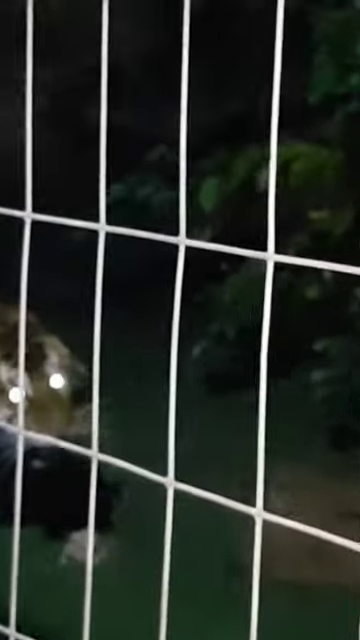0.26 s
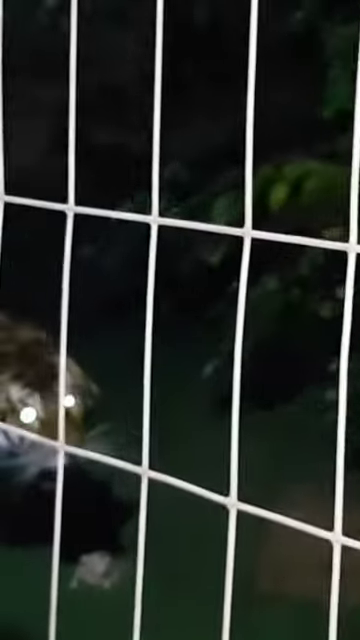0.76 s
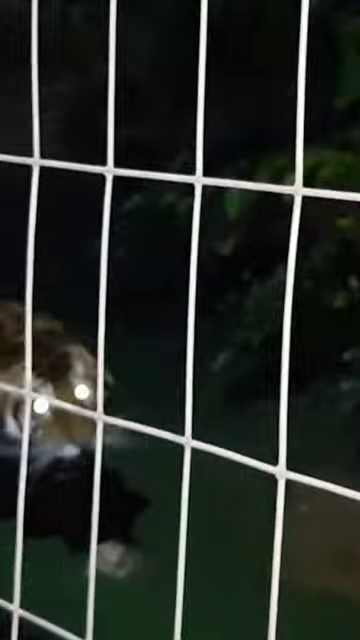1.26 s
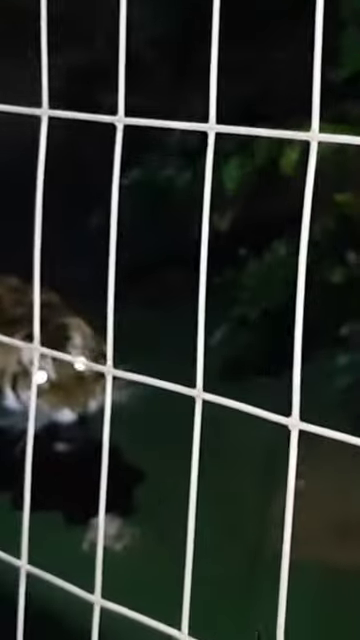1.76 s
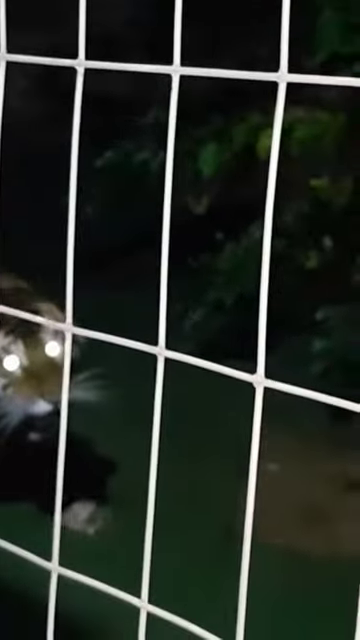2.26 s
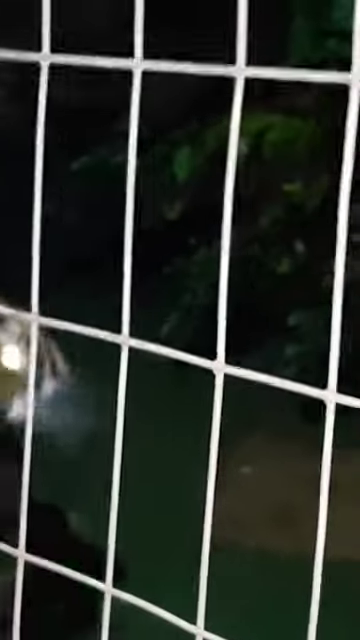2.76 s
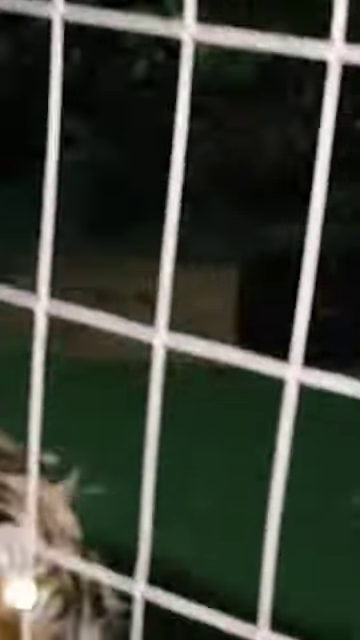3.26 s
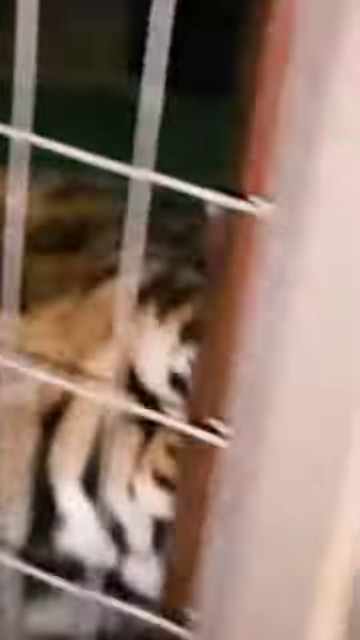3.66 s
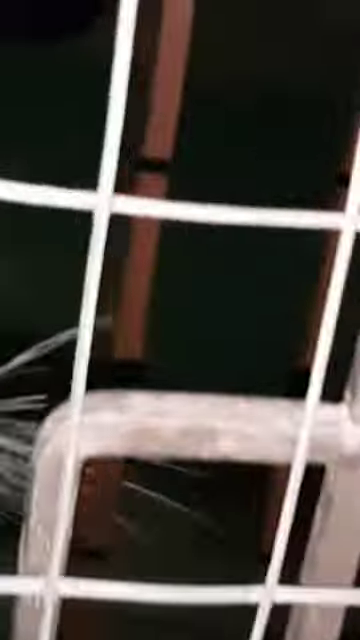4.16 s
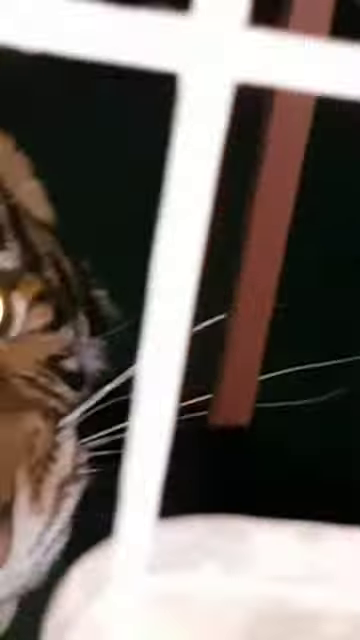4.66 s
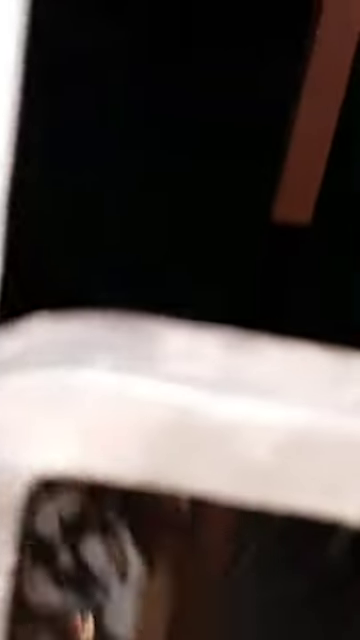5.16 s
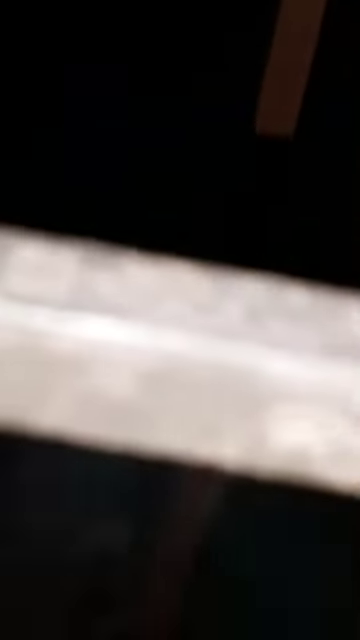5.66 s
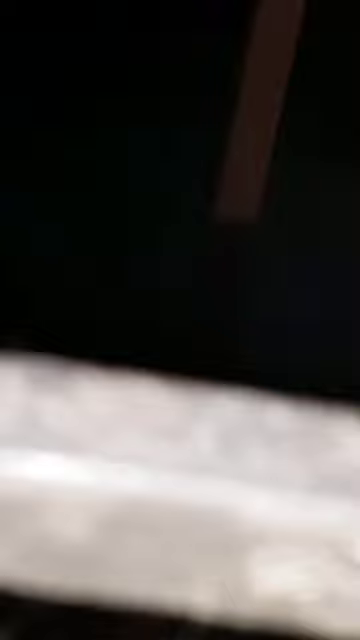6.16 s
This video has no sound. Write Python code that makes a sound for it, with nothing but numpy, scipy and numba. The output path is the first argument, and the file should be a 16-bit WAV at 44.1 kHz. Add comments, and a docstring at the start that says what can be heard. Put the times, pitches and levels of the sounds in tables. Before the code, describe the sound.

A tiger in a hard-walled pen at night, heard close by a phone. From 0 to 0.8 s a faint deep purr beats slowly, under it weak outdoor noise and a low hum that sinks between 0.9 and 1.6 s. From 0.8 s a faster, rough inward growl swells, with a hard slap near 1.36 s; from 1.73 s a slower ticking outward growl grows until 2.4 s. Ragged growling with a cluster of hard wet knocks comes at 2.5-2.8 s, then one explosive, wide-mouthed, hissing roar peaks around 3.0-3.1 s. It collapses raggedly to near silence by 3.6 s, with barely audible nose whistles. At 3.8 s a long fluttering chest growl starts abruptly and rolls in waves until 6.0 s; a thin nose whistle appears near 5.9 s. From 6.05 s a loud raspy inward breath swells with faint rising whistling, cut off around 6.4 s.

```python
"""At night a tiger purrs quietly, growls breath after breath, and near 2.8 s bursts into one roar. The roar
dies down, a long growl breathed out follows, and from 6.05 s an inward breath swells. Slack vocal folds slap
about 23-65 times a second; each slap pushes the chest, rings throat, mouth and nose, and the air comes in puffs
of hiss. Hard single slaps join from 1.36 s and faint nose whistles from 3.55 s. A hard-walled pen answers the
animal throughout, over faint outdoor noise; a low hum sounds under the purr and sinks early on."""
import sys
import numpy as np
from scipy import signal
from scipy.fft import rfft, irfft, next_fast_len
from scipy.io import wavfile
from scipy.ndimage import uniform_filter1d, map_coordinates
from numba import njit

SR = 44100
rng = np.random.default_rng(int(sys.argv[2]) if len(sys.argv) > 2 else 0)


def inscribe(sig):
    """Save sig as 16-bit PCM at rate SR to the path in sys.argv[1].

    A 1-D sig is mono; a 2-D sig holds one channel per row.
    Samples are clipped to [-1, 1] before scaling.
    """
    pcm = np.round(np.clip(np.atleast_2d(sig).T, -1, 1) * 32767)
    wavfile.write(sys.argv[1], SR, pcm.astype(np.int16))


N = 283563
TIME = np.arange(N) / SR


def amp(db):
    """Decibel law: 20 dB is a factor of ten in amplitude."""
    return 10 ** (np.asarray(db) / 20)


def unit(x):
    """Normalisation to an rms of 1."""
    return x / np.sqrt(np.mean(x ** 2) + 1e-20)


def curves(rows):
    """Linear interpolation: one value per sample for each column after the time."""
    s, *cols = np.transpose(rows)
    return [np.interp(TIME, s, c) for c in cols]


def wobble(rate):
    """Band-limited fluctuation: a smooth random curve with `rate` knots a second."""
    knots = rng.standard_normal(int(N * rate / SR) + 4)
    return map_coordinates(knots, [TIME * rate])


def blend(part, a, b):
    """Equal-power mixing from a (part 0) to b (part 1)."""
    part = np.clip(part, 0, 1)
    return np.sqrt(1 - part) * a + np.sqrt(part) * b


def shared(total_db, *over_db):
    """Power addition: divides a level among layers that stand over_db above the first."""
    first = total_db - 10 * np.log10(1 + sum(amp(db) ** 2 for db in over_db))
    return [first] + [first + db for db in over_db]


def colour(x, points):
    """Minimum-phase filtering: a causal filter with the gain of (Hz, dB) points, brought to rms 1."""
    m = 2 * next_fast_len(N // 2 + 4096)
    f, db = np.transpose(points)
    hz = np.fft.rfftfreq(m, 1 / SR)
    gain = amp(np.interp(np.log(hz + 1), np.log(f + 1), db))
    cepstrum = irfft(np.log(gain + 1e-6), m)
    # folding the cepstrum onto positive time makes the filter causal
    cepstrum[1:m // 2] *= 2
    cepstrum[m // 2 + 1:] = 0
    return unit(irfft(rfft(x, m) * np.exp(rfft(cepstrum)), m)[:N])


def split(x, edge_hz):
    """Band separation: the parts below and above a frequency, each of rms 1."""
    filters = [signal.butter(3, edge_hz, kind, fs=SR, output="sos") for kind in ("low", "high")]
    return [unit(signal.sosfiltfilt(sos, x)) for sos in filters]


@njit
def two_pole(x, a, b):
    """Resonance by feedback: two moving poles, with zeros at 0 Hz and the top of the band."""
    y = np.zeros(len(x))
    for i in range(2, len(x)):
        y[i] = x[i] - x[i - 2] + a[i] * y[i - 1] - b[i] * y[i - 2]
    return y


def ring(x, centre_hz, width_hz):
    """Damped resonance: its centre and width may move, and a wider one dies sooner."""
    r = np.exp(-np.pi * width_hz / SR) * np.ones(N)
    return unit(two_pole(x, 2 * r * np.cos(2 * np.pi * centre_hz / SR), r * r))


def cavities(x, table, drift=0.026, flicker_db=2.8):
    """Parallel resonance: narrow cavities wander with the tongue and ring unevenly from slap to slap."""
    total = 0
    for hz, width, db in table:
        narrow = ring(x, hz * (1 + drift * wobble(6)), width)
        total = total + amp(db + flicker_db * wobble(45)) * ring(narrow, hz * np.ones(N), 5 * width)
    return unit(total)


# Ways the folds move. Each row: timing scatter as a share of a cycle, basic noise share 0-1,
# puff length as a share of a cycle, weakening of every second slap 0-1.
TICKING = (.012, .22, .21, 0)
FIRM = (.01, .21, .29, 0)
LOOSE = (.04, .32, .3, 0)
PURRING = (.02, .33, .25, 0)
DOUBLED = (.035, .44, .35, .25)
RAGGED = (.1, .5, .3, 0)
ROARING = (.12, .75, .6, 0)

# Postures of folds and tract. Each row: start in seconds, way the folds move, inward share 0-1,
# jaws-wide share 0-1, throat in Hz, its glide in Hz per second, mouth in Hz, nose in Hz,
# throat over effort in dB, nose over mouth in dB, rasp over mouth in dB, grit over hiss in dB, fizz over hiss in dB.
POSTURES = [(0, PURRING, 0.53, 0, 248, 0, 645, 812, -15, -4, -3.5, -0.5, -18),
            (.78, DOUBLED, .99, 0.13, 248, 20, 610, 775, -19, -6, -6.5, 12, -5),
            (1.33, DOUBLED, 0.97, 0.034, 333, 30, 600, 770, -12.5, -9.5, -8.5, 6.5, -6.5),
            (1.73, TICKING, 0.31, 0, 261, 5, 638, 807, -12.5, -3, -5.5, 5.5, -22),
            (2.03, FIRM, 0.28, 0, 254, 3, 622, 873, -10.5, -5, -1.5, 3.5, -16),
            (2.43, RAGGED, 0.91, 0.11, 285, 100, 624, 836, -9, -6.5, -7, 7, -6.5),
            (2.74, LOOSE, 0.7, 0.61, 338, 100, 647, 820, -17.5, -9, -7, 2.5, -18),
            (2.83, ROARING, 0.68, 0.78, 371, -330, 570, 927, -5, -6, -6, 3.5, -2),
            (3.19, RAGGED, 0.45, 0.61, 277.6, 22, 596, 783, -4.5, -3, -1.5, -1.5, 1),
            (3.48, RAGGED, 0.52, 0.55, 272, 20, 600, 790, -7.5, -2, -1, 8, -12),
            (3.76, LOOSE, 0.028, 0.058, 293.5, -100, 622, 810, -6.5, -16, -11, 5.5, -7.5),
            (4.0, LOOSE, 0.071, 0.095, 273, -64, 655, 797, -7.5, 2.5, -3, 9.5, -6),
            (4.301, TICKING, 0.027, .03, 247, 63, 670, 733, -7.5, 0.5, -2, 3.5, -9.5),
            (4.6, TICKING, 0.012, 0.044, 282.2, -5, 651.2, 780, -9, -8, 1, 0.5, -10.5),
            (5.28, FIRM, 0.017, 0.11, 288, 5, 640, 825, -9, -14, -4, 7, -3),
            (5.521, FIRM, 0.0089, 0.0073, 291, -20, 679, 826, -10.5, 3.5, 0.5, 7.5, -5),
            (5.74, FIRM, 0.0071, 0.036, 271, -52, 663, 867, -11, 7, -1.5, 7.5, -5),
            (6.06, LOOSE, 0.78, 0.25, 296, 95, 672, 827, -10.5, -1.5, -6.5, 14, 2.5),
            (6.231, FIRM, 0.66, 0.15, 346, -200, 676, 774, -5, -1.5, -9, 6.5, 3)]
BLEND_S = .05  # one posture melts into the next


def postures():
    """Quasi-steady articulation: held values melt together, and throat glides start anew with each row."""
    rows = np.array([(s, *manner, *rest) for s, manner, *rest in POSTURES])
    current = np.searchsorted(rows[:, 0], TIME, "right").clip(1) - 1
    start, *cols = rows[current].T
    glide = cols.pop(7)
    cols[6] = cols[6] + glide * np.minimum(TIME - start, .6)
    return uniform_filter1d(np.array(cols), size=round(BLEND_S * SR), axis=1)


# Slap rate before it bends to the marked slaps. Each row: time in seconds, rate in Hz.
SLAP_RATE = [(0, 27.23), (.25, 26.05), (.59, 22.8), (.77, 22.73), (.79, 64.14), (.96, 64.66), (1.21, 62.43),
             (1.4, 55.26), (1.69, 58.07), (1.75, 32.59), (1.85, 34.86), (2.1, 44.06), (2.22, 44.01),
             (2.4, 38.83), (2.46, 32.35), (2.7, 32.58), (2.76, 52.44), (3.08, 46.86), (3.46, 42.9),
             (3.74, 45.5), (3.8, 47.07), (3.96, 44.02), (4.04, 41.32), (4.16, 39.54), (4.26, 35.25),
             (4.34, 31.93), (4.5, 34.31), (4.68, 32.77), (4.91, 36.97), (5.12, 32.2), (5.26, 36.37),
             (5.35, 40.1), (5.46, 41.63), (5.55, 43.07), (5.68, 40.86), (5.8, 39.25), (5.88, 37),
             (6.0, 32.94), (6.09, 41.8), (6.43, 35.48)]
# Marked slaps; the rate bends a little to land on them, before timing scatter. Each entry: time in seconds.
MARKED_SLAPS = [2.045, 3.825, 4.473, 5.418, 5.732, 6.321]


def folds(jitter, length, second, scatter_db=2.0):
    """Relaxation oscillation: slaps at equal power for any rate, and a maker of the puffs around them."""
    rate_hz, = curves(SLAP_RATE)
    cycle = np.cumsum(rate_hz) / SR
    for last, s in zip([0] + MARKED_SLAPS, MARKED_SLAPS):
        due = cycle[round(s * SR)]
        cycle = cycle + np.interp(TIME, [last, s], [0, round(due) - due])
    cycle = cycle + jitter * wobble(45)
    count = np.floor(np.maximum.accumulate(cycle)).astype(int)
    size = amp(scatter_db * rng.standard_normal(600))[count - count[0]]
    size = size * (1 - second * (count % 2))
    slaps = np.diff(count, prepend=count[0]) * size * np.sqrt(SR / rate_hz)

    def puff(leak, uneven_db=1.5, slip=0.08):
        """Modulated turbulence: fresh noise in puffs of uneven strength, a little early or late."""
        turn = 2 * np.pi * (cycle - .06 + slip * wobble(40))
        # quick rise, slower fall
        swell = np.exp(0.098 * (np.cos(turn) - 0.35 * np.sin(2 * turn) - 1) / length ** 2)
        flow = (swell + leak) / np.sqrt(length)
        return unit(amp(uneven_db * wobble(40)) * flow * rng.standard_normal(N))
    return unit(slaps), puff


# Chest and windpipe breathing out, breathing in, and with jaws wide.
# Each row: frequency in Hz, relative gain in dB.
CHEST_OUT = [(25, -23), (40, 3), (72, 4.5), (100, -2.5), (122, 3), (145, 3), (200, -9), (260, -13),
             (400, -92), (900, -120)]
CHEST_IN = [(25, -38.5), (60, 8), (125, -6), (155, -1.5), (190, 10), (230, -11), (300, -11), (400, -89),
            (900, -120)]
CHEST_WIDE = [(25, -30), (60, 4), (108, 0), (135, 1.5), (165, 7.5), (220, -10), (300, 4), (400, -93),
              (900, -120)]


def chest(flaps, puff, share, inward, wide):
    """Forced vibration: the chest follows the slaps almost cleanly."""
    low = blend(share ** 2, flaps, puff(0.59))
    # the first, quiet purr sits as deep as an inward breath
    deep = np.maximum(inward, TIME < POSTURES[1][0])
    breath = blend(deep, colour(low, CHEST_OUT), colour(low, CHEST_IN))
    return blend(wide, breath, colour(low, CHEST_WIDE))


def throat(flaps, puff, share, wide, hz):
    """Cascaded resonance: a sharp ring and a broad one, both narrower with jaws wide."""
    sharp = ring(blend(share + 0.16, flaps, puff(1.0)), hz, 100 - 45 * wide)
    return ring(sharp, 0.97 * hz, 380 - 170 * wide)


def mouth(slaps, puff, share, inward, hz):
    """Cascaded resonance: the mouth rings at each slap, more damped on inward breaths."""
    source = blend(share + .3, slaps, puff(.25))
    sharp = ring(source, hz, 60 + 60 * inward)
    return amp(1.5 * wobble(45)) * ring(sharp, hz, 260 + 150 * inward)


def nose(slaps, puff, share, hz):
    """Cascaded resonance: the nose rings at the slaps and at noisy puffs."""
    source = blend(share + 0.6, slaps, puff(0.073))
    return amp(1.16 * wobble(45)) * ring(ring(source, hz, 140.0), hz, 155)


# Narrow cavities breathing out, breathing in, and with jaws wide.
# Each row: frequency in Hz, width of the sharp ring in Hz, relative level in dB.
RINGS_OUT = [(1054, 29, 1), (1555, 44, 0), (1910, 128, 6.5), (2159, 57, 1.5), (2814, 93, -6.5),
             (3157, 79, -6.5), (3544, 10, -14), (3956, 84, -9.5)]
RINGS_IN = [(1040, 42, -2.5), (1472, 55, 3), (1756, 84, -1.5), (2074, 47, -5.5), (2536, 65, -6.5)]
RINGS_WIDE = [(1100, 160, 0), (1424, 76, 2.5), (1856, 71, 4), (2470, 80, -17), (2830, 61, -4.5),
              (3990, 47, -15)]
# Breath between those cavities: out, in, and with jaws wide. Each row: frequency in Hz, relative gain in dB.
RASP_OUT = [(680, -21), (1150, -40), (1330, -12.5), (1900, -5.5), (2590, -25.5), (3380, -21), (3930, -17.5),
            (4600, -27), (5980, -94), (10100, -120)]
RASP_IN = [(680, -57), (1150, -5), (1700, 10), (1940, -8), (2250, -32), (2590, -15), (2830, -14),
           (4600, -57), (5980, -70), (10100, -120)]
RASP_WIDE = [(500, -51), (850, 1), (932, -12), (1170, 1), (1500, -4), (1620, -17.5), (1880, -4.5),
             (2450, -8.5), (2730, -13), (3490, -18), (4600, -46), (5980, -44), (10100, -120)]


def rasp_and_grit(slaps, puff, share, inward, wide):
    """Resonance with turbulence: cavity rings and breath, parted at 2600 Hz into rasp and grit."""
    rough, air = blend(share + .6, slaps, puff(.22)), puff(.6)
    out = cavities(rough, RINGS_OUT) + amp(-8) * colour(air, RASP_OUT)
    back = cavities(rough, RINGS_IN, flicker_db=1.0) + amp(-2.5) * colour(air, RASP_IN)
    roar = cavities(rough, RINGS_WIDE) + amp(3.5) * colour(air, RASP_WIDE)
    bands = zip(*(split(x, 2600) for x in (out, back, roar)))
    return [blend(wide, blend(inward, a, b), c) for a, b, c in bands]


# Air past the teeth, first ordinary and then with jaws wide. Each row: frequency in Hz, relative gain in dB.
TEETH_AIR = [(3500, -35), (4300, -4), (4800, -1.5), (5400, -8), (6000, 0), (6500, 1), (7100, -10),
             (7800, -2.5), (8600, -12.5), (9400, -10), (11000, -6.5), (14200, -3), (15800, -4)]
TEETH_AIR_WIDE = [(2530, -41), (4300, 7.5), (4900, 7.5), (5770, 12), (6610, 2), (7250, 12.5), (8000, 10.5),
                  (9890, -6.5), (14800, -2), (15800, -11)]


def hiss_and_fizz(puff, wide):
    """Turbulent jet noise: air past the teeth, parted at 9000 Hz into hiss and fizz."""
    air = puff(0.91, uneven_db=1.7)
    # each puff rings the gap between the teeth
    gap = ring(puff(0.13), 6400 * (1 + 0.032 * wobble(35)), 580)
    teeth = amp(-1.5 + 2.9 * wobble(45)) * gap
    narrow = split(colour(air, TEETH_AIR) + teeth, 9000)
    agape = split(colour(air, TEETH_AIR_WIDE), 9000)
    return [blend(wide, a, b) for a, b in zip(narrow, agape)]


# Loudness, one list a breath. Each row: time in seconds, effort in dB, chest over effort in dB,
# mouth, nose and rasp together over effort in dB, hiss and grit together over effort in dB.
BREATHS = [
    [(0.0, -50, -5, -5, -20), (0.022, -39.5, -3.5, -11.5, -27), (0.442, -52, 2.5, -5.5, -20.5),
     (0.466, -46, 1, -10.5, -30), (0.65, -57.5, 4.5, -7.5, -21), (0.78, -62, 1, -18, -24)],
    [(2.43, -37, -6, -6, -24), (2.502, -35.5, -5, 3.5, -14.5), (2.538, -28.5, -2, 0, -25),
     (2.562, -27, -6.5, -1, -23.5), (2.64, -26.5, -5, -0.5, -22.5), (2.73, -35, -8, -11, -40)],
    [(6.05, -51, 1, -8, -26), (6.08, -35, -14, 3.5, -15.5), (6.21, -21, -2, -5.5, -18.5),
     (6.284, -18.5, -10.5, -4.5, -33.5), (6.376, -20, -1, -6, -27.5), (6.43, -24, 3.5, -1.5, -20.5)],
    [(0.78, -55, -7, 0, -23), (0.834, -48, -5, 3, -24), (0.946, -34, -3.5, 0.5, -17.5),
     (1.26, -28, -6, -3, -20), (1.316, -29.5, -5, -0.5, -20.5), (1.494, -31, -1, -0.5, -20.5),
     (1.644, -35.5, -10, -7, -28.5), (1.73, -48, 1, -12, -38)],
    [(1.73, -45, 1.5, -16, -37), (1.774, -52, -3, -1, -16), (1.8, -43, 1.5, -7, -20),
     (1.87, -37.5, -4.5, 2, -18), (1.926, -34.5, -2, -3.5, -16.5), (2.086, -30.5, -2.5, -0.5, -12),
     (2.326, -26, -3.5, -7, -14.5), (2.43, -39.5, -4, -9, -23)],
    [(2.73, -36, -13, -21, -39), (2.754, -32, -6, 0, -18), (2.828, -18.5, -3.5, 1, -13),
     (2.97, -12.5, -26, -5.5, -22.5), (3.094, -12, -29, -7, -21.5), (3.11, -15, -27, -2.5, -20.5),
     (3.176, -19.5, -26, -8.5, -25.5), (3.2, -22.5, -23, -15, -37)],
    [(3.2, -23, -20, -11, -35), (3.262, -26, -16, -6, -28.5), (3.278, -25.5, -16, -10.5, -36),
     (3.38, -31.5, -8.5, -6.5, -24), (3.486, -38, -8, -11, -30.5), (3.538, -51, -13, -12, -23),
     (3.592, -59.5, -5, 5.5, -19), (3.76, -56, -6, -12.5, -17)],
    [(3.77, -54, -7, 6, -11), (3.8, -36.5, -10, -6, -22), (3.84, -21.5, -6, -5, -26.5),
     (3.92, -22, -5.5, -6.5, -22), (4.02, -22.5, -4.5, -9.5, -19.5), (4.16, -25.5, -6.5, -7.5, -15.5),
     (4.27, -30, -4.5, -6.5, -17), (4.34, -34, -5, -10.5, -20.5), (4.42, -30.5, -4, -6.5, -20),
     (4.56, -33.5, -4, -5, -18), (4.72, -31.5, -3, -7, -19), (4.9, -26.5, -2.5, -5.5, -21),
     (5.0, -28, -1, -7.5, -23), (5.12, -33, -4.5, -18, -18), (5.28, -26.5, -2, -8, -22.5),
     (5.38, -26, -2.5, -2, -16), (5.46, -22.5, -2.5, -6, -21.5), (5.56, -22.5, -2, -6.5, -17),
     (5.7, -23.5, -1, -7, -20), (5.82, -25, -2, -4, -19.5), (5.93, -27.5, -1.5, -8, -24),
     (6.0, -36, -2, -4.5, -20), (6.045, -48, -1, -7, -24)],
]
SEESAW_DB = 1  # mouth and nose slowly trade strength


def tiger():
    """Source-filter principle: slaps and puffs pass through chest, throat, mouth, nose and teeth."""
    effort, chest_over, mouth_over, treble_over = curves(sorted(map(tuple, np.concatenate(BREATHS))))
    (jitter, share, length, second, inward, wide, throat_hz, mouth_hz, nose_hz,
     throat_over, nose_over, rasp_over, grit_over, fizz_over) = postures()
    nose_over = nose_over + SEESAW_DB * wobble(9)
    mouth_db, nose_db, rasp_db = shared(effort + mouth_over, nose_over, rasp_over)
    hiss_db, grit_db = shared(effort + treble_over, grit_over)
    slaps, puff = folds(jitter, length, second)
    # the loose folds rebound twice, about 9 and 17 ms after a slap
    flaps = unit(slaps + 0.44 * np.roll(slaps, 380) + 0.27 * np.roll(slaps, 730))
    rasp, grit = rasp_and_grit(slaps, puff, share, inward, wide)
    hiss, fizz = hiss_and_fizz(puff, wide)
    layers = [(effort + chest_over, chest(flaps, puff, share, inward, wide)),
              (effort + throat_over, throat(flaps, puff, share, wide, throat_hz)),
              (mouth_db, mouth(slaps, puff, share, inward, mouth_hz)),
              (nose_db, nose(slaps, puff, share, nose_hz)),
              (rasp_db, rasp), (grit_db, grit), (hiss_db, hiss), (hiss_db + fizz_over, fizz)]
    return sum(amp(db) * unit(x) for db, x in layers)


# Walls of the pen. Each row: frequency in Hz, time to die by 60 dB in seconds.
PEN_DECAY = [(100, 0.53), (500, 0.62), (3000, 0.27), (12000, 0.13)]


def pen(x):
    """Reverberation: each frequency of the walls' answer dies at its own speed."""
    hz, t, z = signal.stft(rng.standard_normal(SR // 2), SR, nperseg=256)
    f, decay_s = np.transpose(PEN_DECAY)
    t60 = np.interp(np.log(hz + 1), np.log(f), decay_s)[:, None]
    tail = signal.istft(z * amp(-60 * t / t60), SR, nperseg=256)[1]
    late = np.pad(x, (500, 0))  # the answer starts about 11 ms late
    return signal.fftconvolve(late, tail / np.linalg.norm(tail))[:N]


# A low hum under the purr. Each row: mean frequency in Hz, mean starting level in dB.
LOW_HUM = [(91.5, -51)]
# Outdoor noise. Each row: frequency in Hz, relative gain in dB.
OUTDOORS = [(18, -40), (30, -14.5), (137, -0.5), (178, -21), (382, -10), (537, -17.5), (1340, -21),
            (1700, -17), (4730, -40), (5540, -44.5), (15800, -47)]
OUTDOORS_DB = -56.5  # mean level; it wavers


def night():
    """Stationary background: coloured noise; beside it a wavering low hum under the purr sinks 14 dB from 0.9
    to 1.6 s."""
    hum = np.zeros(N)
    for hz, db in LOW_HUM:
        turn = 2 * np.pi * np.cumsum(hz + 3 * wobble(8)) / SR
        hum += amp(db + 2 * wobble(12)) * np.sin(turn)
    noise = amp(OUTDOORS_DB + 2.2 * wobble(8.4)) * colour(rng.standard_normal(N), OUTDOORS)
    return noise + hum * amp(np.interp(TIME, [.9, 1.6], [0, -14]))


# Hard single slaps. Each row: time in seconds, level in dB before a common 2.5 dB cut, ring in Hz.
HARD_SLAPS = [(1.357, -8.5, 710), (1.861, -23, 654), (2.517, -23, 636), (2.542, -1.5, 754),
              (2.601, -4.5, 784), (2.633, -15, 780), (2.672, -8.5, 546), (2.770, -14, 640),
              (2.787, -11, 654), (3.348, -12, 754), (3.419, -14, 745), (3.845, -13, 661.7),
              (6.271, -13, 730)]


def snaps():
    """Impulse response: a hard slap rings the mouth once, with a crack."""
    out, t = np.zeros(N + SR), np.arange(SR // 20) / SR
    for s, db, hz in HARD_SLAPS:
        noise = np.convolve(rng.standard_normal(len(t)), np.hanning(24) / 3, "same")
        crack = 0.032 * amp(-60 * t / 0.0067) * noise
        knock = amp(-60 * t / .013) * np.sin(2 * np.pi * hz * t) * (1 - np.exp(-t / .0003))
        out[round(s * SR):][:len(t)] += amp(db - 2.5) * (knock + crack)
    return out[:N]


# Nose whistles. Each row: start in seconds, length in seconds, first pitch in Hz, last pitch in Hz,
# mean level in dB.
NOSE_WHISTLES = [(3.55, .07, 4290, 4430, -82), (3.625, .06, 4540, 4600, -76), (3.69, .11, 4790, 4740, -73),
                 (5.871, .2, 3440, 3290, -53), (6.042, .1, 3800, 3880, -48), (6.14, 0.36, 4180, 4860, -58)]


def whistles():
    """Aeroacoustic whistling: air in a narrow nostril gives an unsteady tone with its octave."""
    out = np.zeros(N)
    for s, length, first_hz, last_hz, db in NOSE_WHISTLES:
        done = np.clip((TIME - s) / length, 0, 1)
        on = uniform_filter1d((done > 0) * (done < 1) * 1., size=600)
        # the pitch settles as it goes
        hz = first_hz + (last_hz - first_hz) * np.sin(np.pi * done / 2)
        turn = 2 * np.pi * np.cumsum(hz + 60 * wobble(300)) / SR
        tone = np.sin(turn) + amp(-18) * np.sin(2 * turn)
        out += on * amp(db + 4 * wobble(70)) * tone
    return out


def scene():
    """Superposition: the animal, the pen's answer 11 dB down, and the night."""
    cat = tiger() + snaps() + whistles()
    return (cat + amp(-11) * pen(cat) + night())[None]


TOP_HZ = 15750  # nothing passes from here up


def record(dry):
    """Saturation and band limiting: a phone rounds the loudest peaks and drops deep bass and top treble."""
    m = next_fast_len(N + 8192)
    hz = np.fft.rfftfreq(m, 1 / SR)
    held = dry / (1 + np.abs(dry / .68) ** 4) ** .25
    gain = (hz < TOP_HZ) / np.sqrt(1 + (30 / (hz + 1)) ** 4)
    return irfft(rfft(held, m) * gain, m)[:, :N]


dry = scene()
out = record(dry)
inscribe(out)
```